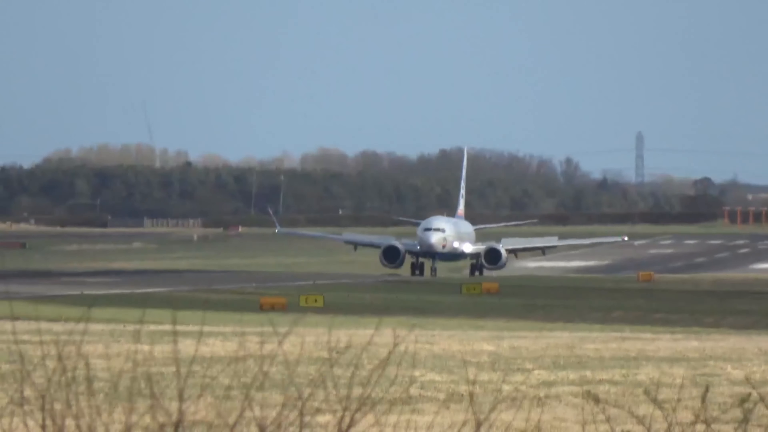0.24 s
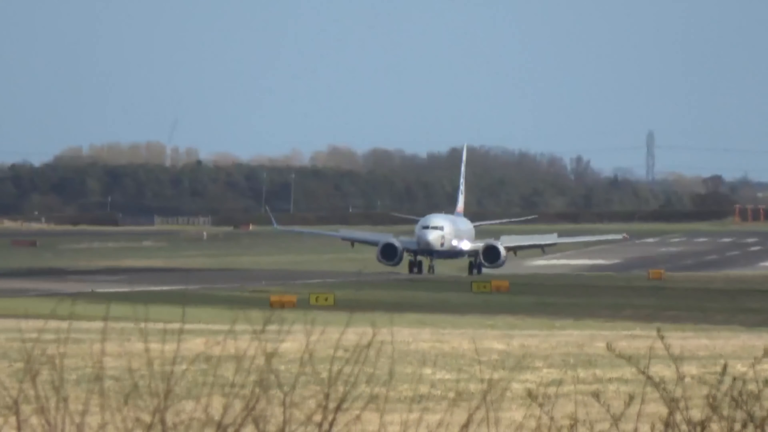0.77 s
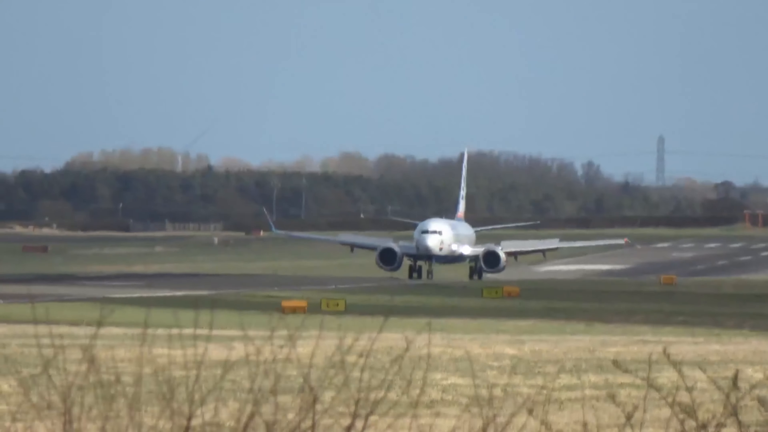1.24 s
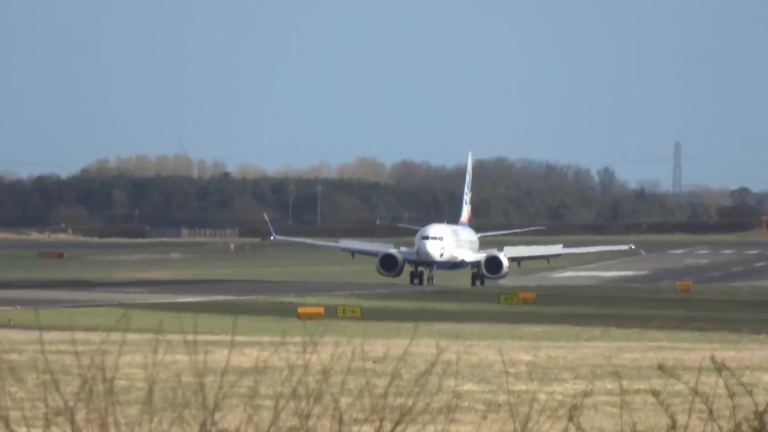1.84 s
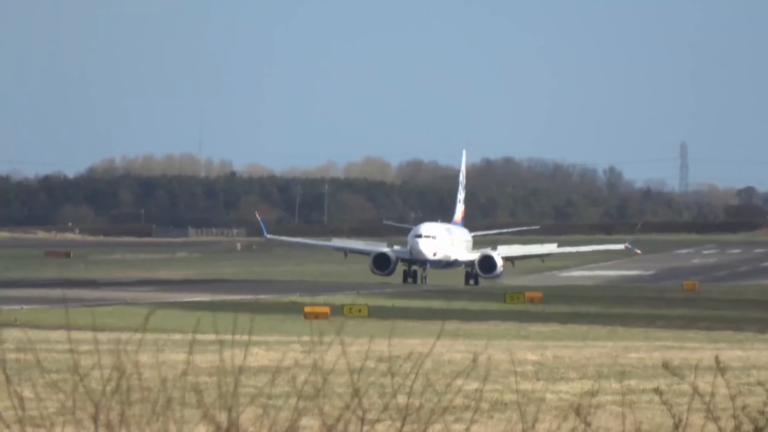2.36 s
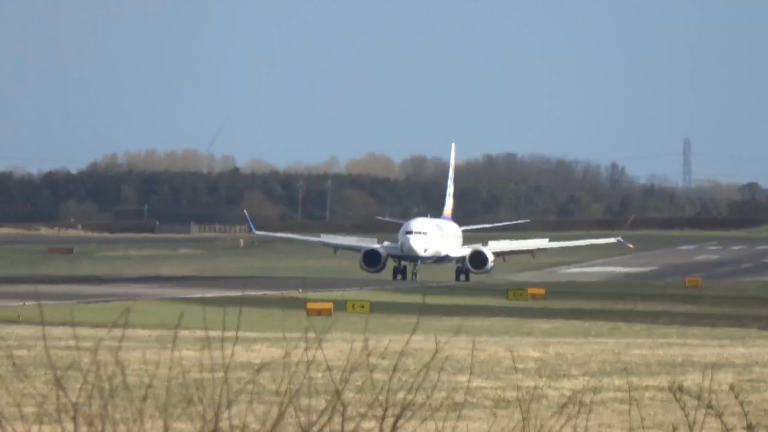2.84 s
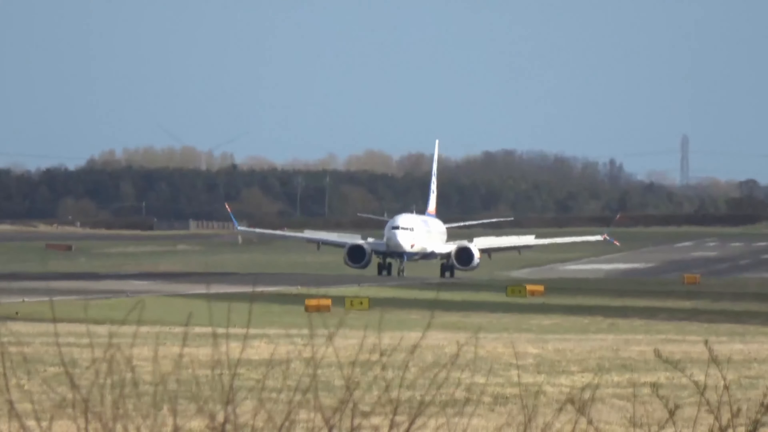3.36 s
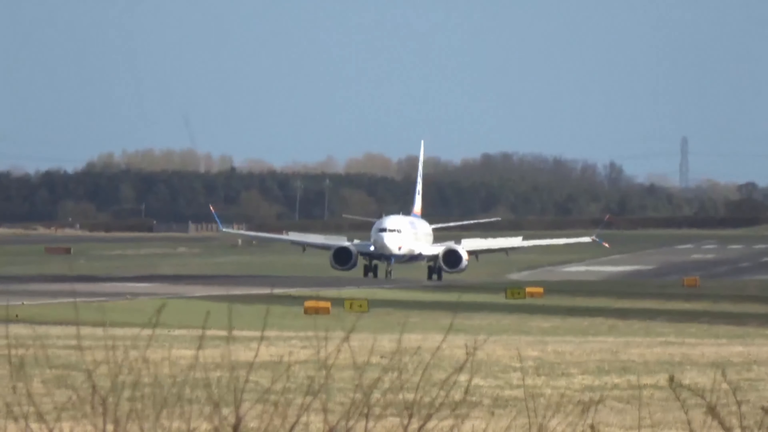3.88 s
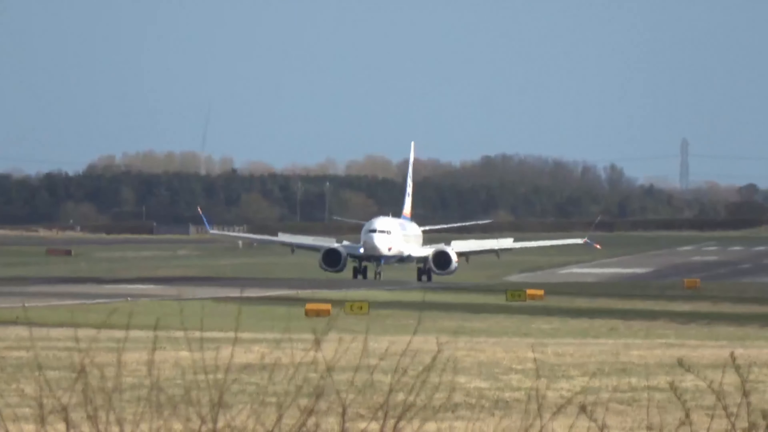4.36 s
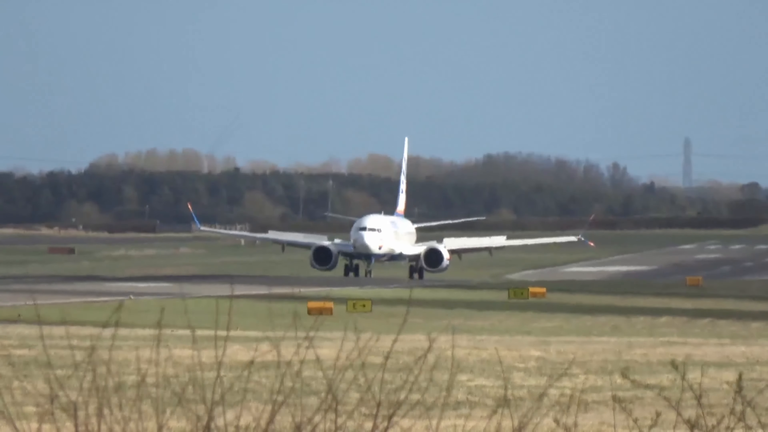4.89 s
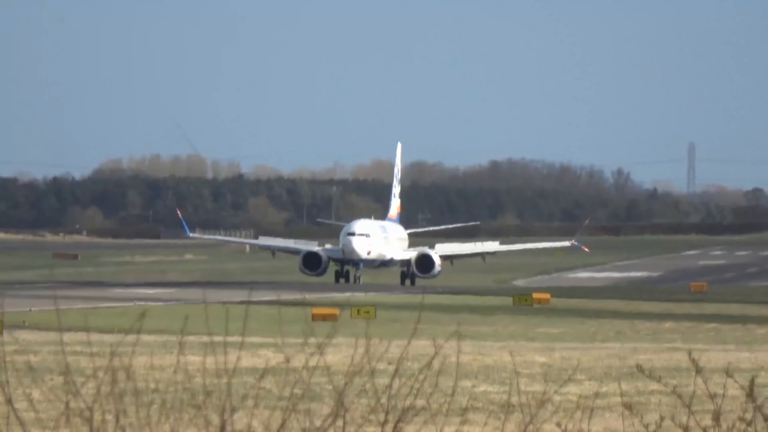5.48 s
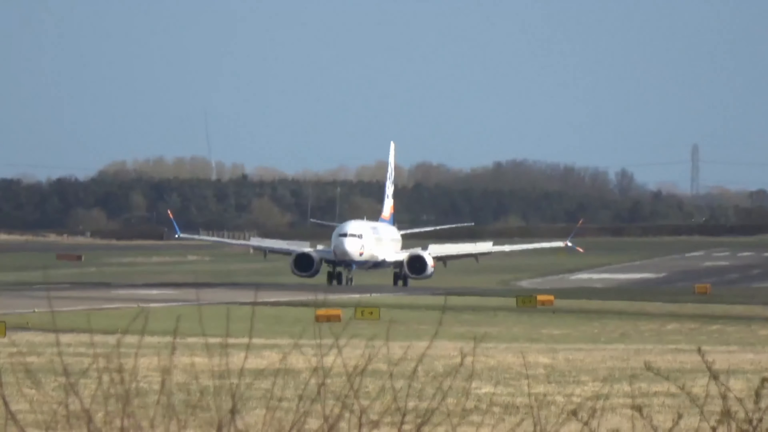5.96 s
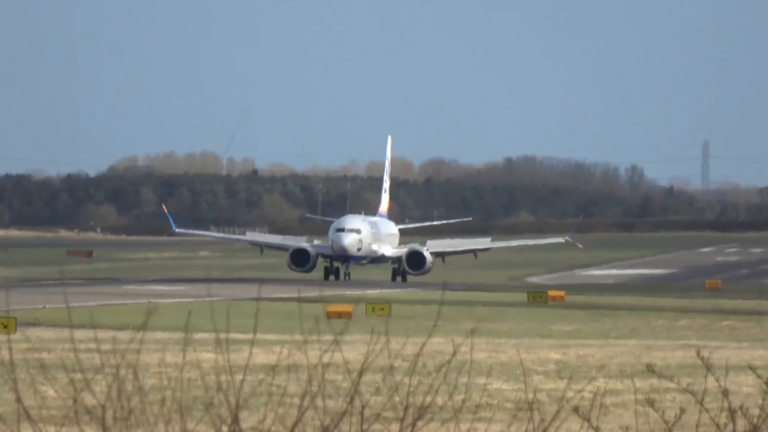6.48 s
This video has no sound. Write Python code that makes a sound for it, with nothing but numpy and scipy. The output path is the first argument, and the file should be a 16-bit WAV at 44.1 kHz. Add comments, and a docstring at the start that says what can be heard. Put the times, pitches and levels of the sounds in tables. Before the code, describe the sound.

Deep wind thumps dominate an unshielded microphone in an open field. Behind them, a far jet airliner roars in reverse thrust, quickly cuts back and fades, leaving rumbling exhaust, airy fan rush and hiss that gradually come nearer. A faint whine, sinking slightly, arrives in short swells, clearer in the second half. Near twigs rustle softly with a few dry ticks, and a tiny bird peeps twice.

```python
"""The roar of reverse thrust, with brief hoots in it, reaches across a windy field from an airliner rolling out.
It dies away and leaves the rush of the fans and a thin, slowly sinking whine, all made of coloured
noise and wavering tones. Gusts of lumpy low noise and damped shoves thump against the microphone.
Close in front of it dry twigs rustle and knock as noise bursts; a small bird peeps twice, far off."""
import sys
import numpy as np
from scipy import signal
from scipy.fft import rfft, irfft, next_fast_len
from scipy.io import wavfile
from scipy.ndimage import uniform_filter1d, map_coordinates

SR = 44100
rng = np.random.default_rng(int(sys.argv[2]) if len(sys.argv) > 2 else 0)


def store_wav(level_fs):
    """Save 16-bit WAV to argv[1]."""
    pcm = np.round(np.clip(np.atleast_2d(level_fs), -1, 1) * 32767)
    wavfile.write(sys.argv[1], SR, pcm.T.astype(np.int16))


N = 296793
TIME = np.arange(N) / SR
# noise is shaped in a longer spectrum; its bins in Hz, kept above zero for the logarithm
SIZE = next_fast_len(N + SR // 4)
BINS = np.maximum(np.arange(SIZE // 2 + 1) * SR / SIZE, 1)

# reverse thrust crests, is cut back and then fades
THRUST_PEAK_S, THRUST_PEAK_HALF_S, THRUST_PEAK_DB = 0.45, 0.22, 1
THRUST_CUT_S, THRUST_FADE_DB_PER_S = 1.241, 6
# the roar's level before the crest, and how far and how fast it drops at the cut
ROAR_DB, ROAR_DROP_DB, ROAR_DROP_S = -27, 7, 0.21
HOOT_HALF_S = 0.022

# the idling engines grow louder once the aircraft starts to come near
NEARING_S = 2.4
EXHAUST_DB, EXHAUST_RISE_DB_PER_S = -34, 0.69
FAN_DB, FAN_RISE_DB_PER_S = -36.5, 1.22
HISS_DB, HISS_RISE_DB_PER_S = -42.0, 0.91
FAN_BLADES, BUZZ_DB = 24, -43.5

# the fan tone sinks towards idle; between its swells it is faint and slowly grows
WHINE_IDLE_HZ, WHINE_EXCESS_HZ, SPOOL_DOWN_S = 1651, 149, 4.6
WHINE_DB, WHINE_RISE_DB_PER_S = -59, 0.5

# a steady breeze lies under the gusts (levels before the trims in wind)
BREEZE_SWING_DB, BREEZE_FLUTTER_DB = -27, -27.5
GUST_RISE_S, GUST_FALL_S = 0.026, 0.08
# the wind drops away once
LULL_S, LULL_HALF_S, LULL_DEPTH_DB = 1.81, 0.064, -6

CUTOFF_HZ = 11000


def reverse_thrust(waver_hz=4.5):
    """The deflected jet roars unevenly in a few low resonances, which now and then flare up as hoots."""
    # colour of the roar: (frequency [Hz], level per Hz [dB])
    roar_colour = [(60, -37), (110, 0), (160, 0), (260, 0), (380, -3.5), (480, -5.5), (600, -7),
                   (750, -10.5), (1000, -16), (1500, -20.5), (2000, -18.5), (2600, -26), (4400, -33.5),
                   (9000, -54.5)]
    # resonances in the roar: (frequency [Hz], width [Hz], height [dB])
    roar_peaks = [(195, 20, 5), (295, 16, 6.5), (337.4, 24, 7), (382, 18, 6.5), (452.5, 20, 6),
                  (531, 40, 4.5), (740, 43, 5.5), (3100, 1200, 4.5)]
    # brief flares of the resonances: (time [s], peak level [dB], pitch [Hz])
    hoots = [(.07, -26, 348), (.08, -30, 212.7), (.18, -24, 301), (.4, -28.5, 200.3), (.53, -26, 304),
             (.555, -21.5, 202), (.6, -26, 131.8), (.76, -23.5, 112.8), (.77, -29.5, 333)]

    level_db = ROAR_DB + wind_down(ROAR_DROP_DB, ROAR_DROP_S)
    jet = through_air(turbulence(roar_colour, roar_peaks), depth_db=1.16, rate=13)
    out = from_db(level_db) * jet
    # in cycles, shared by all hoots
    bend = np.cumsum(waver_hz * drift(14.0)) / SR
    for s, db, hz in hoots:
        tone = np.sin(2 * np.pi * (hz * TIME + bend))
        out += from_db(db) * bell(s, HOOT_HALF_S) * tone
    return out


def compressors(half_width_hz=250.0, wander_hz=60.0):
    """The compressors' shrill hiss: an uneven, wandering band of noise that fades after the thrust is cut."""
    # course of the band: (time [s], pitch [Hz], level [dB])
    shrill = [(0, 3470, -44.5), (.15, 3280, -45.5), (.3, 3210, -47.5), (.55, 3220, -43), (.75, 3236, -47.5),
              (1.0, 3284, -48), (1.25, 3280, -46), (1.4, 3250, -52.5), (2.5, 3280, -56), (3.2, 3346, -57),
              (4.0, 3450, -60), (4.6, 3450, -65)]

    hz, level_db = in_time(shrill)
    band = narrow_band(hz + wander_hz * drift(18), half_width_hz)
    return from_db(level_db) * through_air(band, depth_db=0.5, rate=20)


def idling_engines(share=0.078):
    """Exhaust rumble, the hollow rush of the fans and the hiss of their blades, carried over in surges."""
    # colour of the exhaust rumble: (frequency [Hz], level per Hz [dB])
    rumble_colour = [(40, -31.5), (70, -9), (110, 1), (190, -1), (260, -3.5), (340, -4.5), (430, -8),
                     (550, -13), (750, -13), (1200, -35), (2500, -57)]
    # resonances in the rumble: (frequency [Hz], width [Hz], height [dB])
    rumble_peaks = [(194, 20, 1.5), (318, 20, 0.5), (307, 43, 1)]
    # colour of the blade hiss: (frequency [Hz], level per Hz [dB])
    hiss_colour = [(500, -11), (1000, 3.5), (1400, 1.5), (2000, -2.5), (2600, -6.5), (3000, -8.5),
                   (3550, -11), (4000, -13.5), (4500, -20.5), (5400, -21), (6400, -32), (7400, -34),
                   (11000, -41)]
    # surges on the wind:
    # (time [s], half length [s], change of rumble [dB], of fan rush [dB], of hiss [dB])
    surges = [(0.824, 0.043, 2, 5.5, 0), (1.05, 0.12, -4, 3, -0.81), (2.46, 0.17, 3, -1, 0.46),
              (2.74, 0.03, 2.5, 0, 0.52), (2.96, 0.087, -1, 2.5, -0.28), (3.995, 0.25, -0.5, 1, 1.78),
              (4.213, 0.02, 2.5, 2.5, .5), (5.03, 0.13, 4, 1, -0.59), (5.416, 0.096, 1, 2, -0.29),
              (6.55, 0.034, 0.2, 1, 0.85)]

    nearing = np.maximum(TIME - NEARING_S, 0)
    lifts = sum(np.outer(changes, bell(s, half)) for s, half, *changes in surges)
    rumble_lift, rush_lift, hiss_lift = lifts

    rumble_db = EXHAUST_DB + EXHAUST_RISE_DB_PER_S * nearing + rumble_lift
    rumble = from_db(rumble_db) * turbulence(rumble_colour, rumble_peaks)

    rush_gain = from_db(FAN_RISE_DB_PER_S * nearing + rush_lift)
    rush = rush_gain * through_air(fan_rush(), depth_db=0.26, rate=18)

    hiss_db = HISS_DB + HISS_RISE_DB_PER_S * nearing + hiss_lift
    hiss = from_db(hiss_db) * through_air(turbulence(hiss_colour), depth_db=0.68, rate=60)

    # under reverse thrust part of the rush and hiss goes into the roar
    left = 1 - share * from_db(wind_down(ROAR_DROP_DB, ROAR_DROP_S))
    return rumble + (rush + hiss) * left


def fan_rush(wander=0.03, strand_half_width_hz=22.0):
    """A hollow rush whose centre shifts, with wandering strands of buzz at multiples of the shaft rate."""
    # colour of the fan rush: (frequency [Hz], level per Hz [dB])
    fan_colour = [(350, -34), (550, -12.5), (680, -9.5), (785, -5), (865, -0.5), (950, -5), (1020, -7.5),
                  (1130, -11), (1350, -17.5), (2000, -36.5), (4000, -59)]
    # the hollow shifts as the aircraft rolls on: (time [s], pitch relative to the colour [ratio])
    fan_shift = [(0, 1.01), (1.0, 0.99), (1.6, 1), (2.7, 1.02), (3.1, 0.98), (3.7, 1.003), (5.1, 1.03),
                 (5.4, 1.01), (6.0, 0.99), (6.35, 1.03), (6.6, 1.024)]
    # strands of shaft buzz: (multiple of the shaft rate, level within the buzz [dB])
    strands = [(11, -11), (12, -1.5), (13, 0), (14, -7)]

    shift, = in_time(fan_shift)
    # reading the noise faster or slower moves its whole colour up or down
    rush = map_coordinates(turbulence(fan_colour), [np.cumsum(shift)], order=3, mode="mirror")
    shaft_hz = blade_rate() / FAN_BLADES
    buzz = np.zeros(N)
    for multiple, db in strands:
        strand_hz = multiple * shaft_hz * (1 + wander * drift(3))
        buzz += from_db(db) * narrow_band(strand_hz, strand_half_width_hz)
    return from_db(FAN_DB) * rush + from_db(BUZZ_DB) * rms_one(buzz)


def whine(fading_db=3, wander_hz=2):
    """The blade-passing tone wavers a little and arrives in swells through the moving air."""
    # strongest swells of the tone: (time [s], rms level at the crest [dB], half length [s])
    swells = [(2.34, -48, .05), (2.46, -51.5, .03), (3.0, -49.5, .055), (3.13, -50.5, .025),
              (3.55, -52, .05), (3.95, -46.5, .025), (4.205, -42, .036), (4.43, -42.2, .038),
              (4.76, -46, .032), (4.97, -47.5, .045), (5.19, -45, .028), (5.27, -46, .03),
              (5.68, -45.3, .038), (5.785, -45, .033), (5.92, -49, .04), (6.05, -45.5, .028),
              (6.205, -39.5, .037), (6.45, -43.8, .04), (6.55, -50, .03), (6.72, -46.5, .025)]

    phase = 2 * np.pi * np.cumsum(blade_rate() + wander_hz * drift(35)) / SR
    fading = from_db(WHINE_DB + WHINE_RISE_DB_PER_S * TIME + fading_db * np.minimum(drift(8), 1))
    swell = np.max([from_db(db) * bell(s, half) for s, db, half in swells], axis=0)
    tone = np.sqrt(2) * np.sin(phase)  # rms of one
    return np.maximum(swell, fading) * tone


def wind_down(drop_db, drop_s):
    """Level change in dB of the reverse thrust: it crests, is cut back, then fades."""
    since = np.maximum(TIME - THRUST_CUT_S, 0)
    crest = THRUST_PEAK_DB * bell(THRUST_PEAK_S, THRUST_PEAK_HALF_S)
    return crest - drop_db * np.minimum(since / drop_s, 1) - THRUST_FADE_DB_PER_S * since


def blade_rate():
    """Blades passing per second, sinking as the fans slow down."""
    return WHINE_IDLE_HZ + WHINE_EXCESS_HZ * np.exp(-TIME / SPOOL_DOWN_S)


def wind(swing_db=0.0, flutter_db=-5.0, lumpy_db=1.0, pace_follows=0.049):
    """Big eddies heave the diaphragm, small ones flutter on it; stronger gusts carry the big ones faster."""
    # colours of swing and of flutter: (frequency [Hz], level per Hz [dB])
    swing_colour = [(6, -3), (13, 4), (24, -1.5), (34, -6), (48, -11), (65, -20), (120, -60.5), (300, -87)]
    flutter_colour = [(38, -6.5), (57, 3), (72, -1), (90, -7.5), (118, -11), (155, -27), (300, -37.5),
                      (1000, -80)]
    # gusts on the microphone, levels before the trims:
    # (start [s], hold [s], slow pressure swing [dB], flutter [dB])
    gust_rows = [(.13, 0.35, -17.5, -26.5), (0.564, 0.057, -19.5, -29), (0.983, 0.037, -18.5, -17.5),
                 (1.144, 0.064, -16.5, -43), (1.358, 0.052, -16.5, -15), (1.508, 0.072, -21.5, -37),
                 (1.927, 0.15, -22, -40), (2.096, 0.27, -16.5, -22), (2.4, .09, -15.5, -15.5),
                 (2.585, 0.1, -15.5, -27), (2.732, 0.11, -14.5, -15.5), (2.97, 0.23, -21, -17.5),
                 (3.297, 0.38, -23, -26.5), (3.857, 0.4, -28.5, -27.5), (4.42, 0.14, -19, -29),
                 (4.847, .03, -22.5, -26), (4.96, 0.1, -20, -34), (5.17, 0.15, -20, -26.5),
                 (5.694, 0.17, -23.5, -26.5), (6.525, 0.14, -20.5, -23.5)]

    big, small = from_db(BREEZE_SWING_DB), from_db(BREEZE_FLUTTER_DB)
    for start, hold, big_db, small_db in gust_rows:
        shape = gust(start, hold)
        # gusts add to the breeze in power
        big = np.hypot(big, from_db(big_db) * shape)
        small = np.hypot(small, from_db(small_db) * shape)
    pace = (big / big.mean()) ** pace_follows
    swing = from_db(swing_db) * big * eddies(swing_colour, span=0.042, pace=pace)
    flutter_gain = from_db(flutter_db + lumpy_db * drift(27))
    flutter = flutter_gain * small * eddies(flutter_colour, span=0.043)
    return (swing + flutter) * from_db(LULL_DEPTH_DB * bell(LULL_S, LULL_HALF_S))


def gust(start, hold):
    """A gust rises quickly, holds and dies away more slowly."""
    early = np.maximum(start - TIME, 0)
    late = np.maximum(TIME - start - hold, 0)
    return np.exp(-early / GUST_RISE_S - late / GUST_FALL_S)


def eddies(colour, span, pace=1):
    """Lumpy pressure drifting past; evened over the span (s), so that the gust alone sets its size."""
    travelled = np.cumsum(pace * np.ones(N))
    x = map_coordinates(turbulence(colour), [travelled], order=1, mode="mirror")
    power = uniform_filter1d(np.abs(signal.hilbert(x, SIZE)[:N]) ** 2, int(span * SR))
    return rms_one(x / np.sqrt(power + 0.05))


def buffets(level_db=0.0, rise=0.003):
    """A sudden eddy shoves the diaphragm, which swings back and comes to rest: a damped sine."""
    # hardest shoves: (time [s], level before damping [dB], swing rate [Hz], decay [s])
    shoves = [(.176, -6.5, 32, 0.034), (0.22, -2.5, 24, 0.061), (0.338, -1, 32, 0.019),
              (.414, 1.5, 20, 0.024), (1.302, 5, 28, 0.027), (1.332, -2, 28, .03), (1.376, -6, 96, 0.0083),
              (1.402, 0.5, 39, 0.038), (1.571, -5.5, 19.7, 0.024), (1.936, -7, 27, .025),
              (2.09, -7, 38, 0.023), (2.138, -1.5, 19, 0.028), (2.158, -2, 54, 0.016),
              (2.21, -4.5, 22.4, 0.063), (2.299, 0.5, 30, 0.053), (2.428, 3.5, 41, 0.0095),
              (2.562, -5, 33, 0.032), (2.713, 0, 20, .025), (2.744, -5, 64, 0.016), (2.8, 2, 43, 0.012),
              (2.866, -9, 42, .02), (2.944, -2.5, 20.9, 0.05), (3.029, -8.5, 46, .025),
              (3.135, -11.5, 50, 0.027), (3.171, -7.5, 59, 0.013), (4.479, -11, 22.2, 0.068),
              (4.835, -8.5, 20, .03), (4.957, 1, 21.4, 0.037), (5.037, -1.5, 19, 0.031),
              (5.168, -9, 21, .04), (6.55, -10, 38, 0.024)]

    out = np.zeros(N)
    for s, db, hz, decay in shoves:
        age = np.clip(TIME - s, 0, 1)
        envelope = (1 - np.exp(-age / rise)) * np.exp(-age / decay)
        out += from_db(db + level_db) * envelope * np.sin(2 * np.pi * hz * age)
    # take out the slowest pressure, below 8 Hz
    return signal.sosfilt(signal.butter(1, 8, "high", fs=SR, output="sos"), out)


def twigs(rustle_db=5.5, grain_db=1.4, tick_db=1.5):
    """Dry twigs close by: a grainy rustle, and single knocks of resonant noise that die away at once."""
    # colour of the rustle: (frequency [Hz], level per Hz [dB])
    twig_colour = [(2500, -10), (4500, 6), (6200, 7.5), (7400, 1), (9200, -1), (10000, -4.5), (11000, -6.5)]
    # rustle before the rustle_db trim: (time [s], level [dB])
    rustle_level = [(0, -64), (1.2, -64.5), (1.5, -70), (2.3, -69), (2.8, -64), (3.7, -67), (4.05, -64.5),
                    (4.5, -67.5), (6.2, -67), (6.6, -65)]
    # twigs knocking together, before the tick_db trim:
    # (time [s], level at the start [dB], pitch [Hz], sharpness [Q], decay [s])
    ticks = [(1.98, -51, 4620, 4.4, .004), (2.428, -60, 6300, 5.4, .005), (3.34, -47, 4110, 12, 0.0061),
             (3.41, -55, 6900, 2.07, .004), (5.299, -46, 7790, 2.3, 0.003), (5.707, -58, 8520, 2, 0.0036),
             (6.692, -47, 6060, 3.4, 0.012)]

    level_db, = in_time(rustle_level)
    grainy = rms_one(turbulence(twig_colour) * from_db(grain_db * drift(250)))
    out = from_db(level_db + rustle_db) * grainy
    for s, db, hz, sharpness, decay in ticks:
        first = int(s * SR)
        age = TIME[:N - first][:SR // 5]
        wood = signal.iirpeak(hz, sharpness, fs=SR)
        scrape = rms_one(signal.lfilter(*wood, rng.standard_normal(SR // 5)))[:len(age)]
        out[first:][:len(age)] += from_db(db + tick_db) * scrape * np.exp(-age / decay)
    return out


def bird(waver_hz=25.0):
    """Short, thin, nearly pure notes from far off: sines that waver slightly in pitch."""
    # faint peeps of a small bird: (time [s], peak level [dB], pitch [Hz], half length [s])
    peeps = [(2.13, -60, 6650, .011), (3.103, -55, 4970, .012)]

    out = np.zeros(N)
    bend = np.cumsum(waver_hz * drift(120)) / SR
    for s, db, hz, half in peeps:
        out += from_db(db) * bell(s, half) * np.sin(2 * np.pi * (hz * TIME + bend))
    return out


def dip(at=1.349, half=0.008, depth_db=-9.0):
    """A gain that dips for an instant around one moment."""
    return from_db(depth_db * bell(at, half))


def turbulence(colour, peaks=()):
    """Noise with a broad colour and resonances on top; it falls away beyond both ends."""
    hz, db = np.transpose(colour)
    shape_db = np.interp(np.log(BINS), np.log(hz), db)
    for centre, width, height in peaks:
        shape_db = shape_db + height / (1 + (2 * (BINS - centre) / width) ** 2)
    skirts = np.minimum(1, np.minimum(BINS / hz[0], hz[-1] / BINS)) ** 2
    spectrum = rfft(rng.standard_normal(SIZE)) * from_db(shape_db) * skirts
    return rms_one(irfft(spectrum, SIZE)[:N])


def narrow_band(hz, half_width_hz):
    """A narrow band of noise that follows a pitch: slow noise on two carriers a quarter turn apart."""
    phase = 2 * np.pi * np.cumsum(hz) / SR
    lowpass = signal.butter(2, half_width_hz, fs=SR)
    slow = signal.lfilter(*lowpass, rng.standard_normal((2, N)))
    return rms_one(slow[0] * np.cos(phase) + slow[1] * np.sin(phase))


def through_air(x, depth_db, rate):
    """Moving air makes a far sound waver in level."""
    return x * from_db(depth_db * drift(rate))


def drift(rate):
    """Slow chance with an rms of one, made of noise that falls away above the rate (Hz)."""
    spectrum = rfft(rng.standard_normal(SIZE)) / (1 + (BINS / rate) ** 2) ** 2
    return rms_one(irfft(spectrum, SIZE)[:N])


def bell(s, half):
    """A smooth rise and fall around a moment."""
    return np.exp(-((TIME - s) / half) ** 2 / 2)


def in_time(rows):
    """Each column of a curve at every sample."""
    s, *columns = np.transpose(rows)
    return [np.interp(TIME, s, c) for c in columns]


def from_db(db):
    """Decibels to gain."""
    return 10 ** (np.asarray(db) / 20)


def rms_one(x):
    """Scale to an rms of one."""
    return x / np.sqrt(np.mean(x ** 2) + 1e-20)


def scene():
    """The far aircraft, the wind, the near twigs and a bird, at one microphone."""
    engines = compressors() + idling_engines() + whine()
    # all but the roar and the wind dips briefly
    dipped = (engines + twigs() + bird()) * dip()
    return (reverse_thrust() + dipped + wind() + buffets())[None]


def record(dry):
    """The microphone's output flattens towards full scale; the top is cut steeply."""
    clipped = dry / (1 + dry ** 16) ** (1 / 16)
    # 0.1 dB ripple below the cutoff, 80 dB down above it
    steep = signal.ellip(12, 0.1, 80, CUTOFF_HZ, fs=SR, output="sos")
    return signal.sosfilt(steep, clipped)


dry = scene()
out = record(dry)
store_wav(out)
```